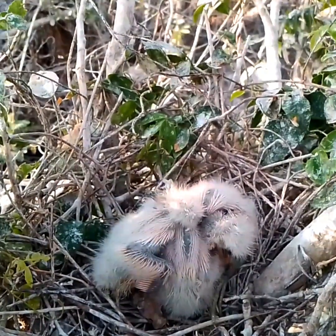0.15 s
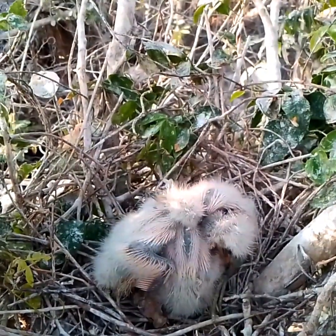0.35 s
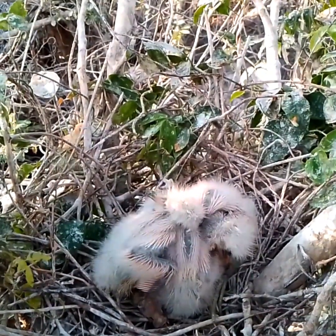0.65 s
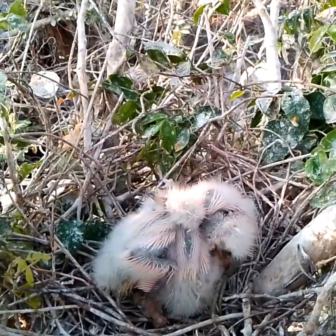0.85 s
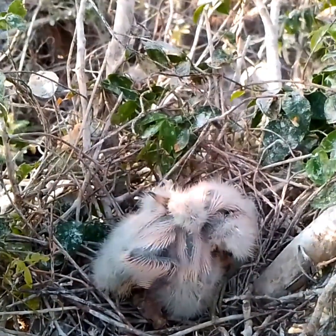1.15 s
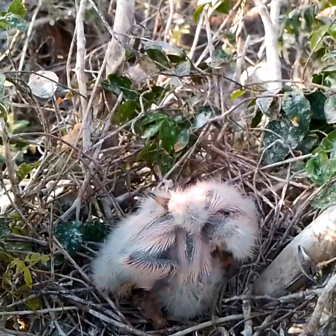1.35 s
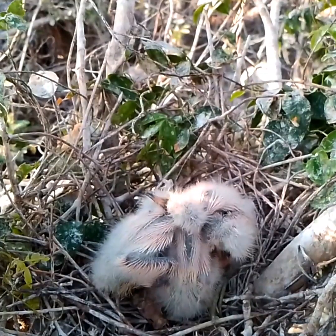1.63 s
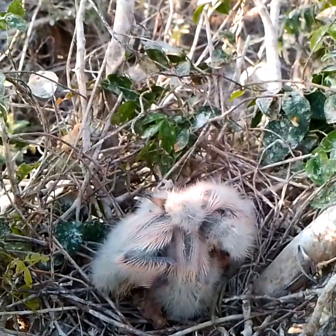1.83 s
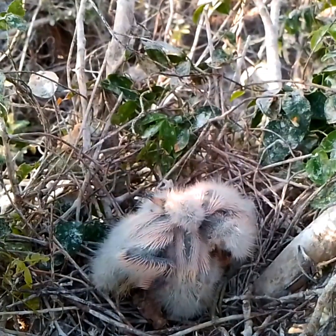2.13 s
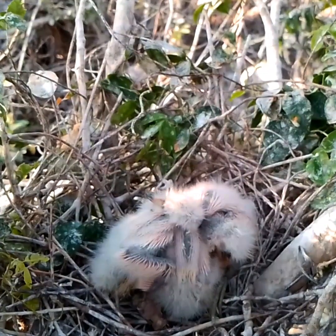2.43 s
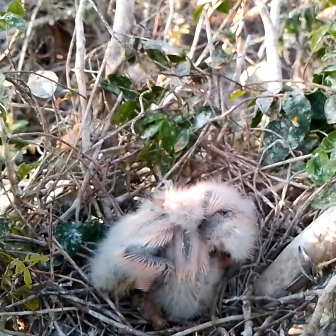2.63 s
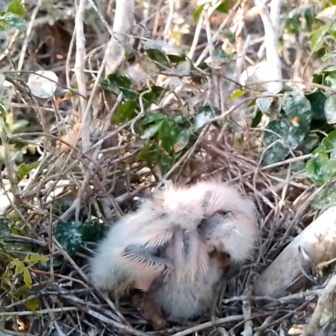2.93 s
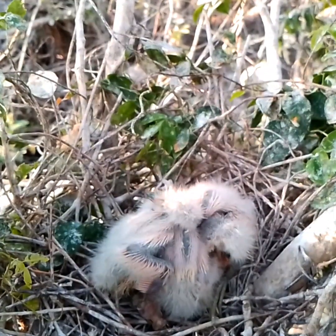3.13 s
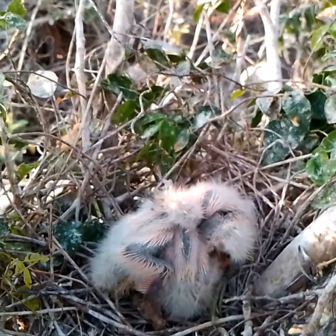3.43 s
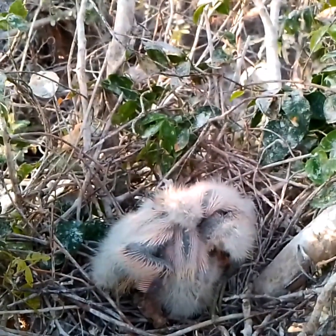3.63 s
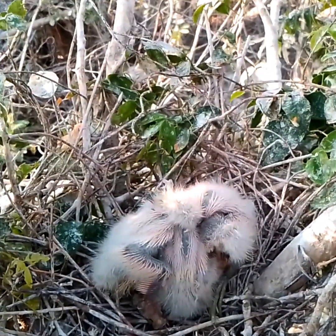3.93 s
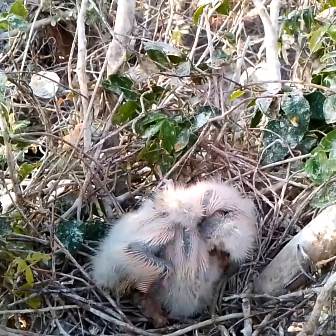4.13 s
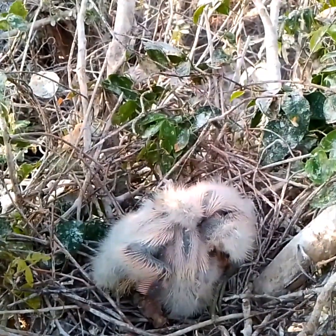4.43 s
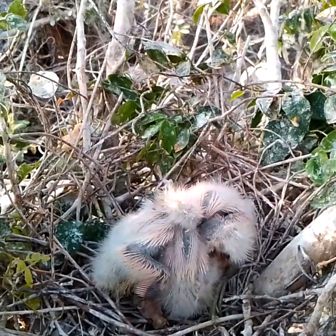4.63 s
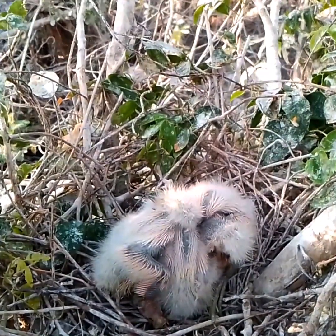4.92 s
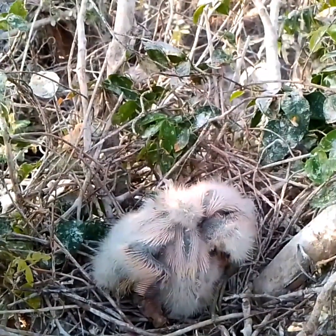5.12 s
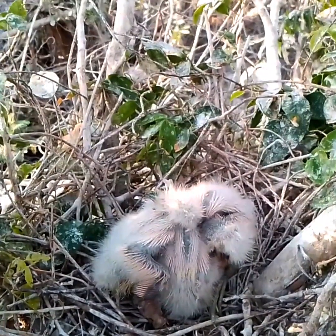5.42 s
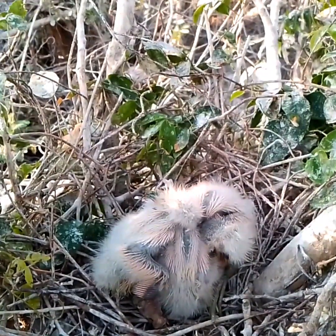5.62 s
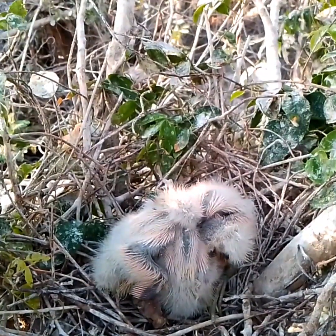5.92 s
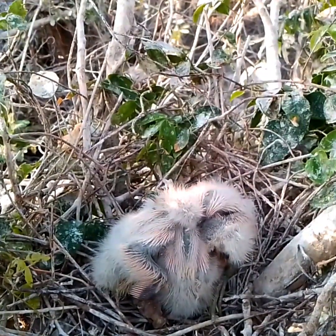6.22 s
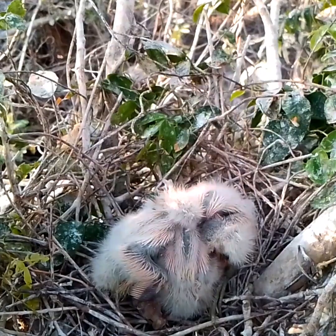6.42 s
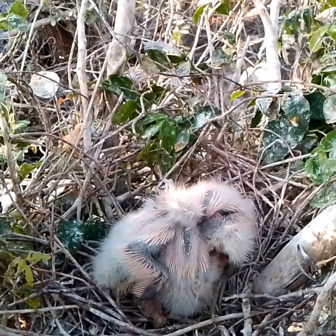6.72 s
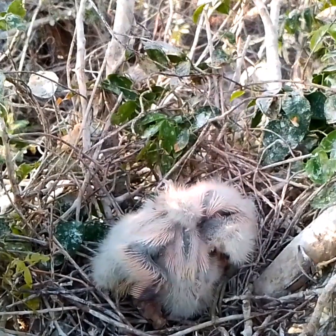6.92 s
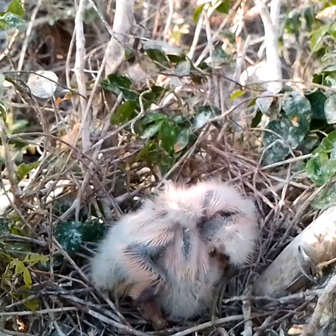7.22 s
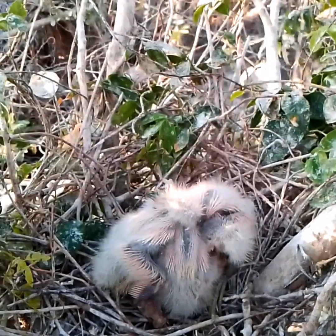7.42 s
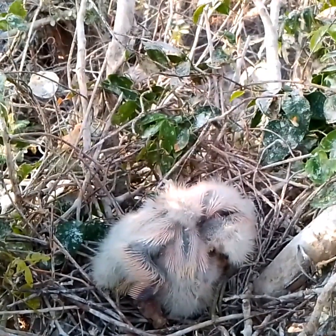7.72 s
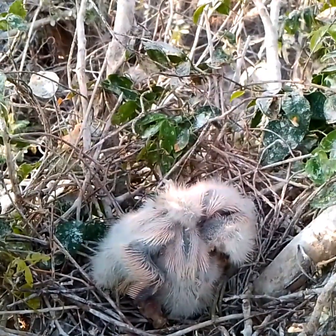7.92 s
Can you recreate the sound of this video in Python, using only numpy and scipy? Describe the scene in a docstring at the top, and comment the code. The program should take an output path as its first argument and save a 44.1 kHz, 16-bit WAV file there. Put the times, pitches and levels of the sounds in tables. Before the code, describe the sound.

Egret chicks call in a twig nest among bushes, close to a small stereo microphone, over faint steady outdoor air and light rustling hiss. From 0 to 0.8 s there are soft dry ticks, low throaty clucks and a small hoarse squeak. Breathy begging syllables then build quickly, about ten a second or faster, strongest around 1.2 to 1.8 s with clucks mixed in, fading by 2.1 s. At 2.3 to 2.5 s one chick gives the loudest sound, a harsh, bright, abrupt two-part rasp. A few begging notes and a bill snap follow until 3 s. From 3 to 5.4 s soft ticks patter irregularly, often in pairs, with one stronger syllable and squeak near 4.4 s. A second, steadier begging run with crisp bill snaps lasts from 5.5 to 6.7 s. Soft ticking and faint squeaks continue to 8 s. Short twiggy echoes blur each call.

```python
"""Egret chicks chatter in a twig nest among bushes, close to a small two-port microphone.
Soft quick ticking swells into runs of breathy begging syllables: puffs of noise shaped by a throat.
Low clucks are slow flaps ringing a throat; squeaks and bill snaps are noise ringing the bill.
One chick gives a loud two-part rasp of harsh puffs. Random echoes stand for twigs and leaves,
and shaped noise makes the quiet outdoor air."""
import sys
import numpy as np
from scipy import signal
from scipy.fft import rfft, irfft, next_fast_len
from scipy.io import wavfile

SR = 44100
rng = np.random.default_rng(int(sys.argv[2]) if len(sys.argv) > 2 else 0)


def pcm_store(signal):
    """Save signal as 16-bit PCM."""
    levels = np.round(np.clip(np.atleast_2d(signal), -1, 1) * 32767)
    wavfile.write(sys.argv[1], SR, levels.astype(np.int16).T)


N = 355357  # length of the scene in samples

# Call levels and efforts are settings before the path gain, the echoes and the microphone ports.
# outdoor air and far rustle, before the ports: [pitch_hz, level_db_per_hz]
AIR = [(45, -110), (110, -109), (165, -123), (250, -108), (700, -109), (1100, -113), (3000, -105),
       (11000, -119), (14000, -118)]
# likeness of the air at the two ports: [pitch_hz, likeness from -1 to 1]
AIR_SAME = [(100, 0.93), (700, 0.59), (2000, 0.32), (4000, 0.054)]
# resonances of the two microphone ports, left then right: [pitch_hz, half_width_hz, boost_db]
PORTS = [(7720, 1466, 18), (10760, 1530, 15)]
# sharp ticks of the opening bill: [start_s, level_db]
TICKS = [(0.319, -52.5), (1.844, -55), (2.843, -46), (5.575, -51.5), (5.723, -42.5), (5.858, -40),
         (6.022, -41.5), (6.158, -44), (6.305, -44), (6.512, -45)]
# small hoarse squeaks: [peak_s, level_db]
SQUEAKS = [(0.616, -54.5), (0.706, -47.5), (4.27, -52.5), (4.385, -44.5), (5.428, -52.5), (6.938, -60),
           (7.143, -55), (7.238, -55), (7.338, -51)]
# low throaty clucks: [peak_s, length_s, level_db, base_pitch_hz]
CLUCKS = [(0.179, 0.044, -62, 1100), (0.325, 0.026, -61.5, 1370), (0.476, 0.043, -53, 1056),
          (0.524, 0.035, -49.5, 1130), (0.667, 0.067, -61.5, 1010), (0.878, 0.042, -56, 1120),
          (1.037, 0.051, -48, 1063), (1.283, 0.099, -54, 756), (1.31, 0.078, -47.5, 1080),
          (1.786, 0.17, -57.5, 1190), (1.959, 0.081, -59.5, 1330), (3.518, 0.052, -61.5, 1390),
          (4.384, 0.03, -61.5, 1250), (4.874, 0.05, -61, 1130), (5.148, 0.024, -60.5, 1020),
          (5.248, 0.021, -66, 1430), (5.366, 0.027, -62.5, 1120), (5.776, .014, -58.5, 1330),
          (5.925, 0.078, -63, 1285), (6.52, 0.013, -50.5, 1765), (6.729, 0.03, -57.5, 1880)]
# two blasts of the rasp: [start_s, length_s, effort_db, start_brightness_db, end_brightness_db]
RASPS = [(2.333, 0.053, -27.2, 3, 1.5), (2.425, 0.079, -22.4, 4, -3)]
# soft ticking calls, often in quick pairs: [peak_s, level_db]
SOFT_TICKS = [(0.045, -57), (0.151, -59), (0.245, -62), (0.334, -63), (0.409, -76), (0.981, -55),
              (2.648, -57), (2.712, -61), (2.991, -59), (3.06, -59), (3.16, -61.5), (3.265, -60),
              (3.308, -63), (3.363, -61.5), (3.425, -58), (3.498, -57.5), (3.538, -59), (3.643, -57),
              (3.753, -57), (3.843, -57.5), (3.868, -55), (3.922, -55.5), (3.962, -54), (4.031, -55),
              (4.07, -55), (4.131, -56), (4.165, -55.5), (4.24, -58.5), (4.338, -54.5), (4.448, -56.5),
              (4.498, -57.5), (4.54, -58), (4.589, -59), (4.611, -58.5), (4.65, -58), (4.718, -56.5),
              (4.752, -59), (4.82, -55), (4.85, -54), (4.9, -57.5), (4.929, -56.5), (5.025, -62),
              (5.05, -64), (5.124, -57.5), (5.26, -59.5), (5.352, -63.5), (5.398, -54), (5.424, -57.5),
              (5.635, -53.5), (6.698, -57.5), (6.764, -64), (6.793, -55), (6.84, -60), (6.885, -61),
              (6.922, -61.5), (6.985, -63), (7.058, -56.5), (7.08, -57), (7.188, -54.5), (7.304, -55.5),
              (7.328, -60.5), (7.408, -59), (7.434, -66.5), (7.468, -64), (7.513, -59), (7.539, -58),
              (7.582, -57.5), (7.613, -57), (7.678, -55.5), (7.711, -61.5), (7.795, -63.5), (7.813, -60),
              (7.909, -57), (7.956, -59.5), (8.014, -57)]
# begging syllables: [peak_s, length_s, level_db, brightness_db]
SYLLABLES = [(0.515, 0.034, -54.5, 16), (0.675, 0.12, -57, -5), (0.797, 0.035, -50.5, 2),
             (0.904, 0.054, -46.5, 5.5), (1.015, 0.073, -43, 8), (1.112, 0.052, -45, 8),
             (1.221, 0.065, -45, 8.5), (1.28, 0.073, -40, 14), (1.321, 0.043, -39.5, 0.5),
             (1.419, 0.051, -41.5, 4), (1.53, 0.045, -40.5, -0.5), (1.598, 0.072, -44, 4),
             (1.636, 0.06, -41, 2), (1.704, 0.033, -41, -0.5), (1.739, 0.052, -42, 1),
             (1.806, 0.023, -43, -0.5), (1.849, 0.026, -44, -1), (1.901, 0.04, -47.5, 5),
             (1.981, 0.081, -50, 1.5), (2.051, 0.032, -55.5, 4), (2.314, 0.016, -47, -1),
             (2.666, 0.037, -46.5, 6), (2.782, 0.057, -42, 6), (2.865, 0.077, -48, 10),
             (2.959, 0.042, -52, 9.5), (4.382, 0.037, -46, 6), (5.534, 0.042, -49.5, 4.5),
             (5.666, 0.048, -47, 8.5), (5.763, 0.06, -46.5, 5), (5.795, 0.024, -45.5, 12),
             (5.862, 0.055, -45, 5), (5.969, 0.049, -43, 5.5), (6.073, 0.053, -43.5, 6.5),
             (6.183, 0.039, -45.5, 6), (6.288, 0.04, -45.5, 3.5), (6.406, 0.063, -45, 4),
             (6.474, 0.058, -46.5, 4.5), (6.519, 0.033, -45.5, 4.5), (6.559, 0.015, -46.5, 9),
             (6.589, 0.032, -46, 4), (6.625, 0.034, -45.5, 3.5), (6.729, 0.04, -49, 3)]
# tone colour when begging: [pitch_hz, relative_level_db]
BEG_COLOUR = [(250, -24.5), (600, -14.5), (1400, -8), (1900, -4), (2300, -7), (2800, 3), (3700, 1),
              (4400, -4), (7000, -14), (9000, -23), (11500, -18.5), (13000, -50)]
# throat colour when rasping: [pitch_hz, relative_level_db]
RASP_THROAT = [(330, -32.5), (1100, -15), (1480, -3), (1780, -2), (2050, -2.5), (2450, -10), (3000, -5),
               (3400, 5), (4500, 0), (7500, -6), (11500, -19), (13400, -8), (14200, -15)]
# way to the microphone, one for each kind of sound: [gain_db, left_port_lead_s, twig_scatter_db]
RASP_PATH = (-2.6, .00019, -.5)
CLUCK_PATH = (-1.46, -0.00017, 10.3)
TICK_PATH = (-6.5, .00011, 0.83)  # also used by the squeaks
SOFT_TICK_PATH = (-2.5, .00013, 4.5)
SYLLABLE_PATH = (-7.5, .00013, 6.1)  # from deep among the twigs

EDGE_HZ = 14250  # upper limit of the microphone
HEAD_SHIFT = .0015  # share by which a moving head stretches the paths through the twigs
# lag of the nest echo at the start of a blast, and how fast the lag grows
NEST_ECHO_S, NEST_ECHO_S_PER_S = .00135, .0018
# each blast snaps on, holds and dies away
RASP_RISE_DB_PER_S, RASP_FALL_DB_PER_S, RASP_EDGE_S = 2000, 1085, .04


def gain_of(db):
    """Turns decibels into amplitude."""
    return 10 ** (np.asarray(db) / 20)


def evened(x):
    """Scales a sound to rms 1."""
    return x / np.sqrt(np.mean(x ** 2) + 1e-20)


def read(points, hz):
    """Reads between the points of a table on a log-frequency axis."""
    f, value = np.transpose(points)
    return np.interp(np.log(hz + 1), np.log(f + 1), value)


def add(mix, s, sound):
    """Mixes a stereo sound in at time s, trimming what falls outside."""
    start = round(s * SR)
    sound = sound[:, max(-start, 0):]
    part = mix[:, max(start, 0):][:, :sound.shape[1]]
    part += sound[:, :part.shape[1]]


def coloured(x, curve):
    """Filters by a function that gives dB at each frequency."""
    size = next_fast_len(x.shape[-1])
    gain = gain_of(curve(np.fft.rfftfreq(size, 1 / SR)))
    return irfft(rfft(x, size) * gain, size)[..., :x.shape[-1]]


def wander(size, rate_hz):
    """Smooth random drift of rms 1: noise with its quick changes filtered out."""
    return evened(coloured(rng.standard_normal(size), lambda f: -10 * (f / rate_hz) ** 2))


def resonate(x, hz, width_hz):
    """A resonance that follows the curve hz: shift it to zero, smooth, and shift back."""
    turn = np.exp(2j * np.pi * np.cumsum(hz * np.ones(len(x))) / SR)
    r = np.exp(-np.pi * width_hz / SR)
    return (turn * signal.lfilter([1], [1, -2 * r, r * r], x / turn)).real


def swell(length, rise, blunt, snap=1):
    """Time from the peak, and a bell: high blunt flattens its top; snap steepens its onset."""
    t = np.arange(-1.5 * length, 2 * length, 1 / SR)
    side_length = length * np.where(t < 0, rise, 1 - rise)
    power = blunt + np.where(t < 0, snap, 0)
    return t, np.exp(-abs(t / side_length) ** power)


def treble(hz):
    """Share of the brightness at each frequency: the open bill favours the treble."""
    return np.clip(np.log2((hz + 1) / 5000), -.6, .4)


def puffs(size, rate_hz, jitter, leak):
    """The voice organ flaps irregularly and lets one puff of rough air through each cycle."""
    rate = rate_hz * (1 + jitter * wander(size, rate_hz))
    turns = rng.random() + np.cumsum(rate) / SR
    opening = leak + np.exp(-(turns % 1) / 0.48)
    return evened(opening * rng.standard_normal(size))


def air():
    """A steady floor, alike at both ports in the bass; the leaf rustle above it stirs."""
    hz = np.fft.rfftfreq(N, 1 / SR)
    a, b = rfft(rng.standard_normal((2, N)))
    same = np.clip(read(AIR_SAME, hz), -1, 1)
    ports = np.array([a, same * a + np.sqrt(1 - same ** 2) * b])
    ports = ports * gain_of(read(AIR, hz)) * np.sqrt(SR / 2)
    rustle = hz ** 2 / (hz ** 2 + 1500 ** 2)
    floor = irfft(ports * (1 - rustle), N)
    return floor + irfft(ports * rustle, N) * gain_of(1.7 * wander(N, 20))


def scatter(t60):
    """Random echoes that fall 60 dB in t60 seconds, different at each port, energy 1."""
    t = np.arange(0, t60, 1 / SR)
    hits = rng.random((2, len(t))) < 1 / 8
    tail = rng.standard_normal((2, len(t))) * hits * gain_of(-60 * t / t60)
    return tail / np.linalg.norm(tail, axis=1, keepdims=True)


def thicket(nest, leaves_db=-14.0, leaves_t60=0.4):
    """Farther leaves and branches add a soft tail, mostly of the short waves."""
    tail = coloured(scatter(leaves_t60), lambda f: -10 * np.log10(1 + (2100 / (f + 1)) ** 4))
    return nest + gain_of(leaves_db) * signal.fftconvolve(nest, tail, axes=1)[:, :N]


def placed(sound, lead, twigs_db):
    """The sound reaches the left port earlier by lead s; near twigs scatter each call anew."""
    sound = np.pad(sound, (0, 2048))  # room for the echoes
    t = np.arange(len(sound))  # in samples
    direct = np.array([sound, np.interp(t - round(lead * SR), t, sound)])
    twigs = signal.fftconvolve(sound[None], scatter(.035), axes=1)[:, :len(t)]
    # thin twigs let long waves pass
    twigs = coloured(twigs, lambda f: -10 * np.log10(1 + (2700 / (f + 1)) ** 4))
    # the moving head stretches the paths one way at the left port, the other way at the right
    stretch = HEAD_SHIFT * (t - t.mean())
    twigs = np.array([np.interp(t + way * stretch, t, x) for way, x in zip((1, -1), twigs)])
    return direct + gain_of(twigs_db) * twigs


def tick(s, db, decay=0.0046, glide=0.00746, pop=0.47, crack=0.77):
    """The bill parts with a bright snap; the opening cavity drops quickly in pitch."""
    t = np.arange(0, .05, 1 / SR)
    drive = rng.standard_normal(len(t))
    snap = crack * evened(coloured(drive, lambda f: read(BEG_COLOUR, f)))
    for hz, ring_db in [(4900, 2.5), (7700, -9.0), (11300, -8.0)]:
        ring = resonate(drive, hz * rng.uniform(0.96, 1.04), 480)
        snap = snap + gain_of(ring_db) * evened(ring)
    cavity = evened(resonate(drive, 1400 + 3000 * np.exp(-t / glide), 270))
    sound = snap * np.exp(-t / decay) + pop * cavity * np.exp(-t / (2 * decay))
    onset = 1 - np.exp(-t / 0.0018)
    return s, gain_of(db + 4.5) * sound * onset


def squeak(s, db, length=.019, hz=2700, fall_per_s=7):
    """A small hoarse squeak: breath rings the half-closed bill and slides down."""
    t, bell = swell(length, rise=0.54, blunt=2.7)
    ring = resonate(rng.standard_normal(len(t)), hz * np.exp(-fall_per_s * t), 680)
    return s + t[0], gain_of(db) * bell * evened(ring)


def cluck(s, length, db, hz, skirt=0.38, chest_ring=0.23, upper_ring=0.11):
    """Slow uneven flaps ring a low throat and a weaker note on each side; it swells and rises."""
    t, bell = swell(length, rise=0.7, blunt=1.47, snap=0)
    turns = rng.random() + np.cumsum(100 * (1 + .5 * wander(len(t), 140))) / SR
    flaps = np.diff(np.floor(turns), prepend=0)  # one click for each whole turn
    drive = evened(flaps * rng.uniform(.5, 1, len(t))) + .7 * rng.standard_normal(len(t))
    pitch = hz * np.exp(.08 * np.tanh(1.5 * t / length + .3))
    note = evened(resonate(drive, pitch, 273))
    note = note + chest_ring * evened(resonate(drive, .68 * pitch, 650))
    note = note + upper_ring * evened(resonate(drive, 1.4 * pitch, 350))
    breath = evened(coloured(drive, lambda f: -13 * np.log2((f + 1) / hz) ** 2))
    # a small bird radiates hardly any bass
    voice = coloured(note + skirt * breath, lambda f: -10 * np.log10(1 + (420 / (f + 1)) ** 6))
    return s + t[0], gain_of(db) * bell * evened(voice)


def rasp(s, length, db, open_db, closed_db, ring=0.18, chest=0.051):
    """Harsh uneven puffs pass the wide-open throat, losing treble as the bill closes."""
    t = np.arange(-RASP_EDGE_S, length + RASP_EDGE_S, 1 / SR)
    rise_db = RASP_RISE_DB_PER_S * np.minimum(t, 0)
    fall_db = RASP_FALL_DB_PER_S * np.maximum(t - length, 0)
    effort_db = db + rise_db - fall_db
    bright_db = np.interp(t, [0, length], [open_db, closed_db])
    drive = puffs(len(t), rate_hz=420, jitter=0.3, leak=0.35)
    voice = evened(coloured(drive, lambda f: read(RASP_THROAT, f)))
    # the head thrusts forward, so the echo from the nest combs the voice in sliding bands
    echo = np.interp(t - NEST_ECHO_S - NEST_ECHO_S_PER_S * t, t, voice)
    voice = evened(voice + .4 * echo)
    # a narrow throat resonance sinks as the bill closes
    throat_hz = np.interp(t, [0, length], [1600, 1410])
    voice = voice + ring * evened(resonate(drive, throat_hz, 210))
    # a chesty growl builds over the first 0.057 s of the blast
    growl = np.clip(t / 0.057, 0, 1) ** 2 * evened(resonate(drive, 765, 550))
    voice = voice + chest * growl
    high = coloured(voice, lambda f: -10 * ((f - 7400) / 1500) ** 2)
    return s + t[0], gain_of(effort_db - 6.5) * (voice + (gain_of(bright_db) - 1) * high)


def soft_tick(s, db):
    """A soft ticking call: one clipped breath through the begging throat, soon gone."""
    return syllable(s, length=.03, db=db, bright_db=4.5, rise=0.36, ring=0.26)


def syllable(s, length, db, bright_db, rise=0.46, ring=0.24):
    """Breathy puffs pass the throat; one narrow resonance chirps down as the bill opens."""
    t, bell = swell(length, rise, blunt=1.06)
    drive = puffs(len(t), rate_hz=270, jitter=.35, leak=.25)
    # throat size and cavity pitch are new for each call
    size, cavity = np.exp(rng.uniform(-1.17, 1, 2) * [.06, .2])
    # every posture of tongue and bill has its own small peaks and dips (one value per Hz)
    ripple_db = 2.6 * wander(SR // 2, SR / 450)

    def throat_db(f):
        return read(BEG_COLOUR, f * size) + np.interp(f, np.arange(SR // 2), ripple_db)

    breath = evened(coloured(drive, throat_db))
    chirp_hz = 2900 * cavity * np.exp(-.32 * np.tanh(t / 0.013))
    rings = evened(resonate(drive, chirp_hz, 280))
    voice = coloured(evened(breath + ring * rings), lambda f: bright_db * treble(f))
    return s + t[0], gain_of(db + wander(len(t), 67)) * bell * voice


def scene():
    """All the chicks' sounds leave the nest through the thicket, over the outdoor air."""
    nest = np.zeros((2, N))
    layers = ((tick, TICKS, TICK_PATH), (squeak, SQUEAKS, TICK_PATH),
              (cluck, CLUCKS, CLUCK_PATH), (rasp, RASPS, RASP_PATH),
              (soft_tick, SOFT_TICKS, SOFT_TICK_PATH), (syllable, SYLLABLES, SYLLABLE_PATH))
    for source, rows, (path_db, lead, twigs_db) in layers:
        for row in rows:
            s, sound = source(*row)
            add(nest, s, gain_of(path_db) * placed(sound, lead, twigs_db))
    return thicket(nest) + air()


def record(dry):
    """Each microphone port rings at its own pitch; then a filter removes the highest treble."""
    heard = np.array([coloured(x, lambda f: db / (1 + ((f - hz) / width) ** 2))
                      for x, (hz, width, db) in zip(dry, PORTS)])
    low_pass = signal.firwin(511, EDGE_HZ, window=("kaiser", 9), fs=SR)
    return signal.oaconvolve(heard, low_pass[None], "same")


dry = scene()
out = record(dry)
pcm_store(out)
```